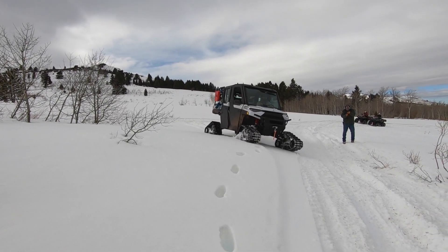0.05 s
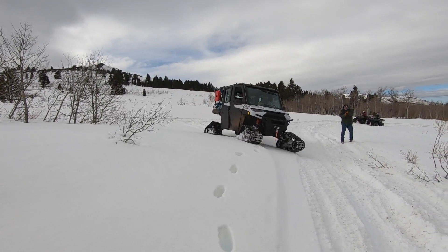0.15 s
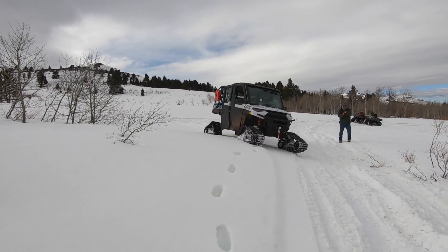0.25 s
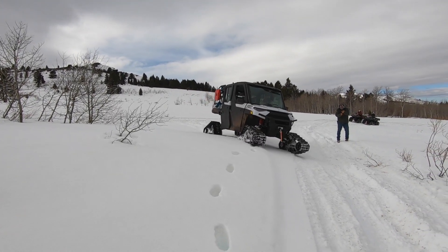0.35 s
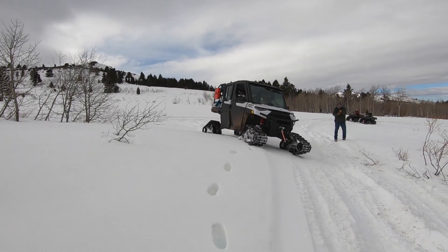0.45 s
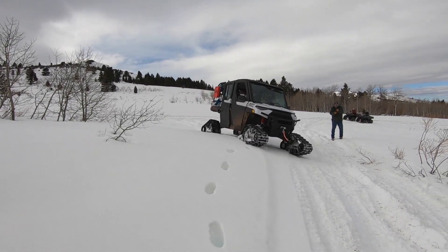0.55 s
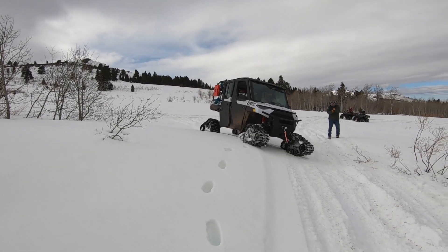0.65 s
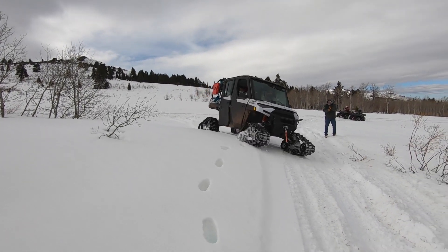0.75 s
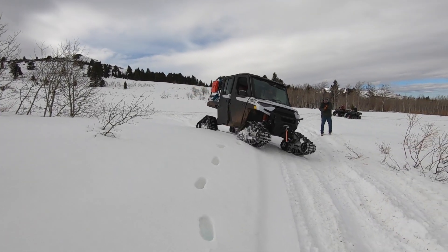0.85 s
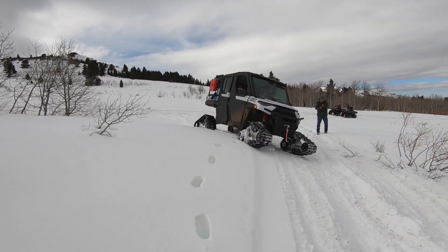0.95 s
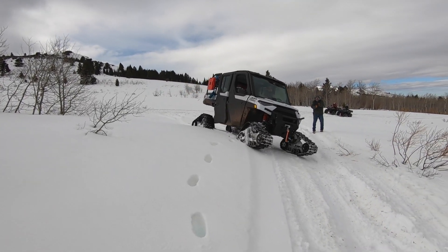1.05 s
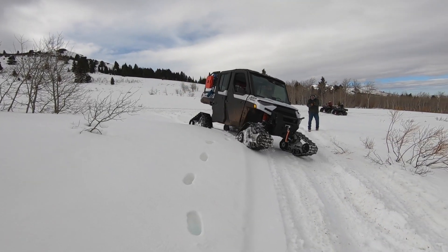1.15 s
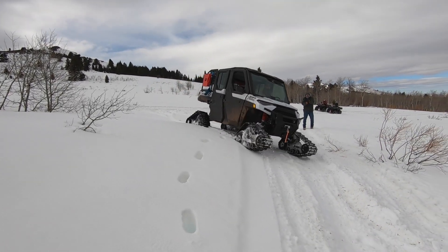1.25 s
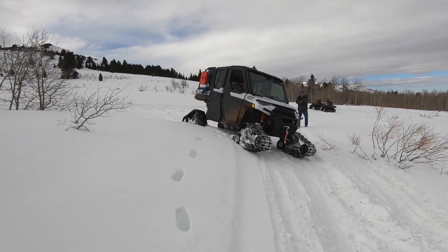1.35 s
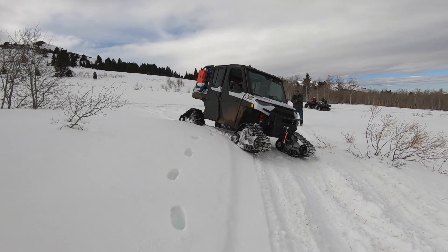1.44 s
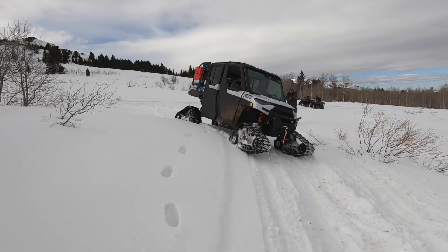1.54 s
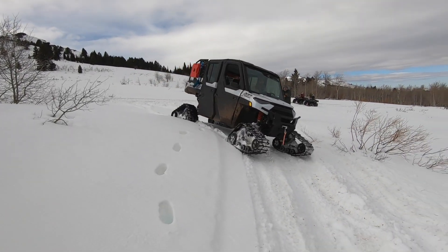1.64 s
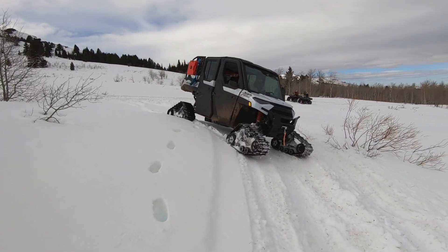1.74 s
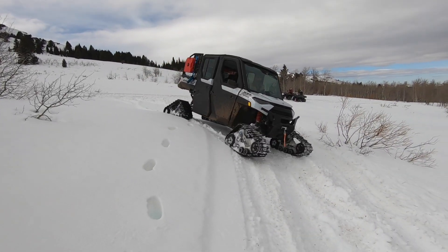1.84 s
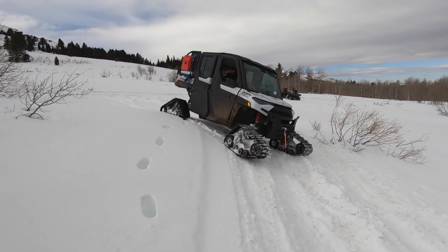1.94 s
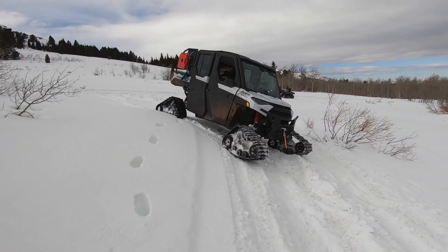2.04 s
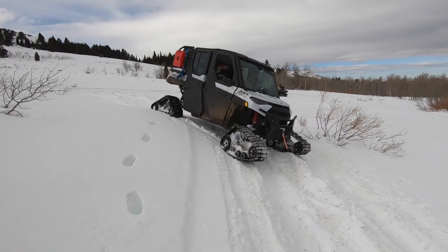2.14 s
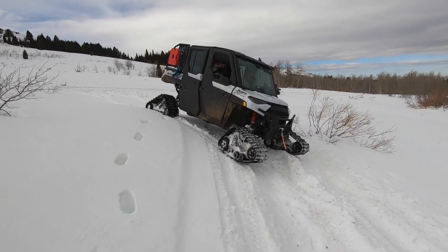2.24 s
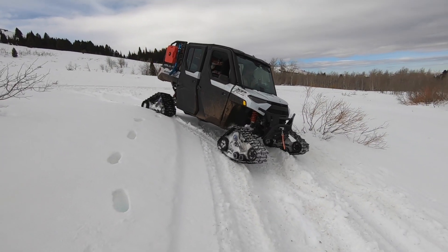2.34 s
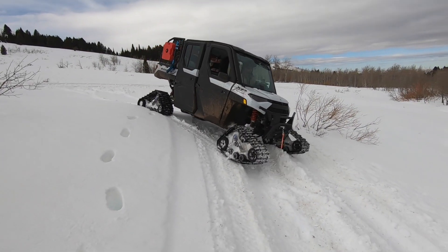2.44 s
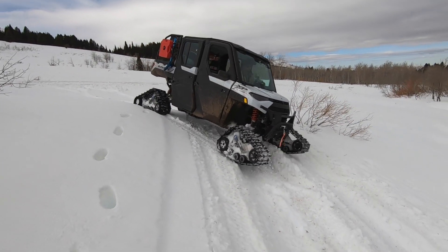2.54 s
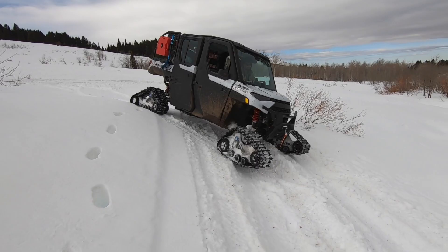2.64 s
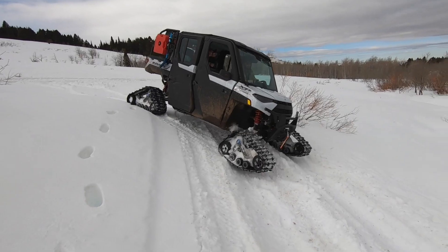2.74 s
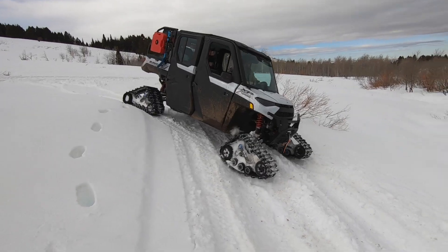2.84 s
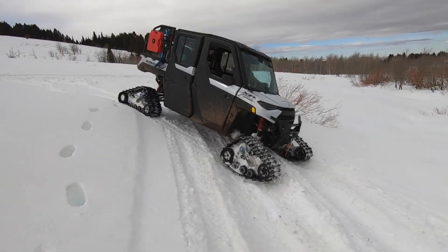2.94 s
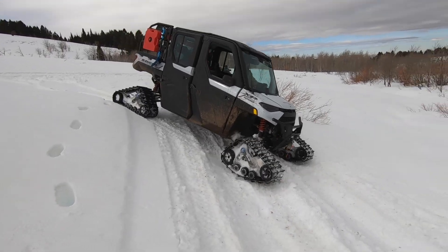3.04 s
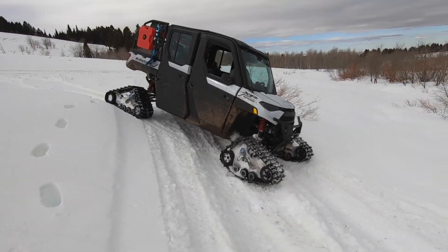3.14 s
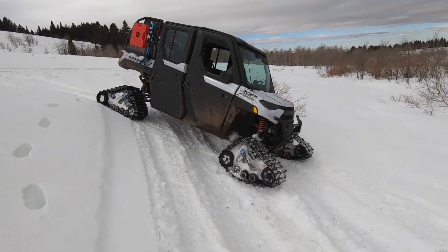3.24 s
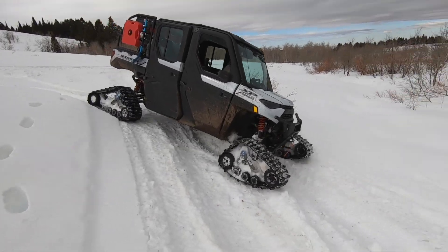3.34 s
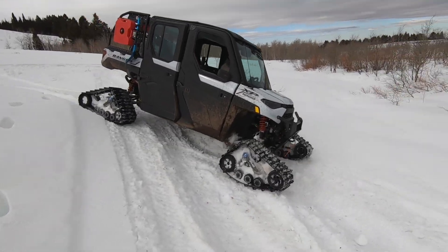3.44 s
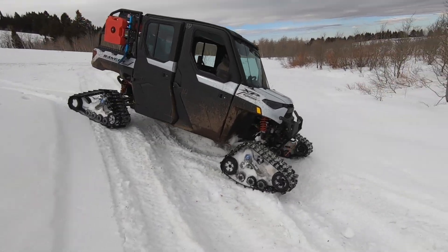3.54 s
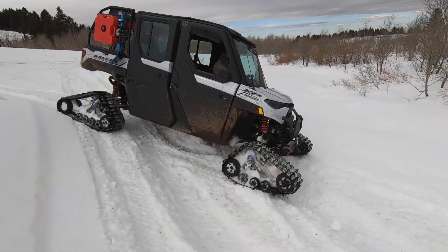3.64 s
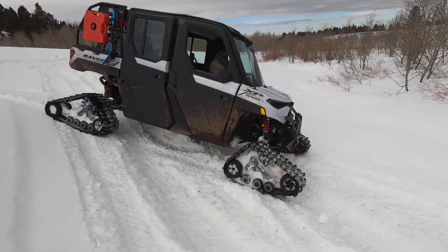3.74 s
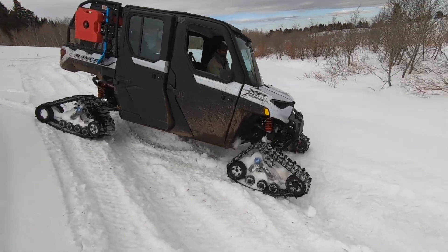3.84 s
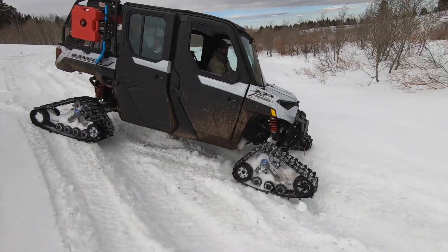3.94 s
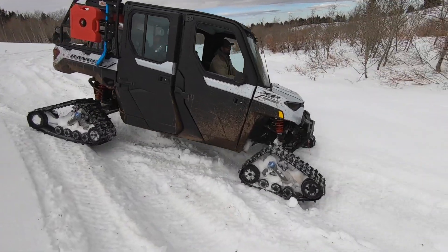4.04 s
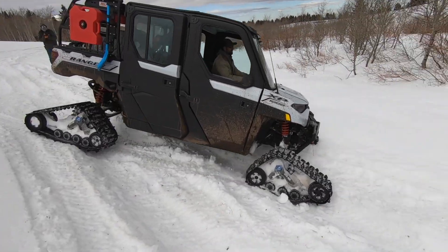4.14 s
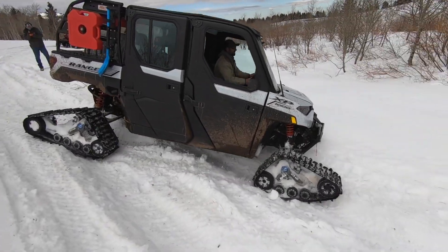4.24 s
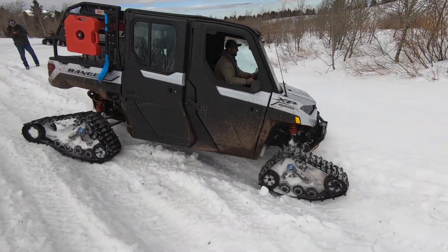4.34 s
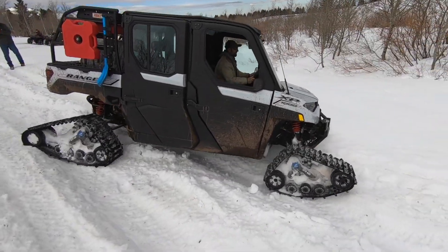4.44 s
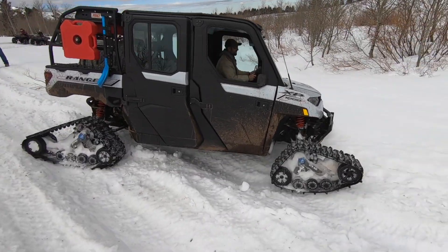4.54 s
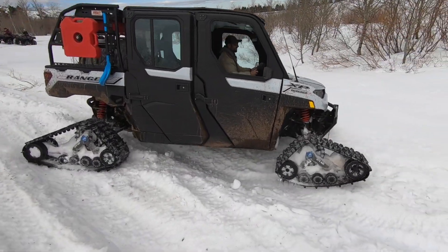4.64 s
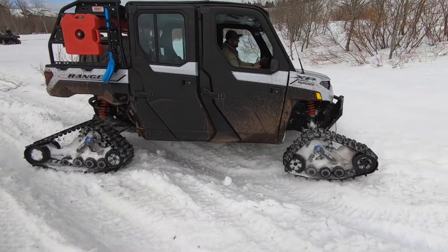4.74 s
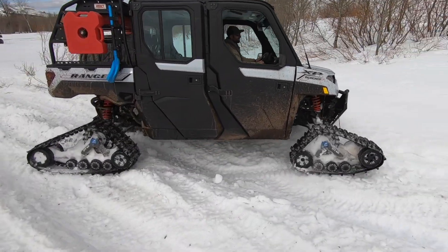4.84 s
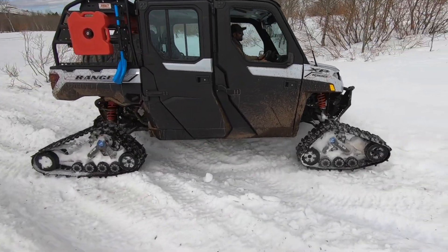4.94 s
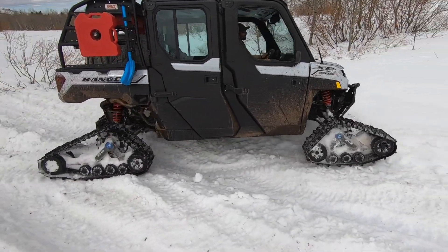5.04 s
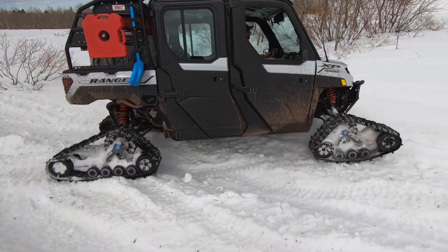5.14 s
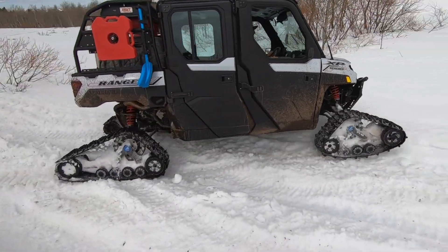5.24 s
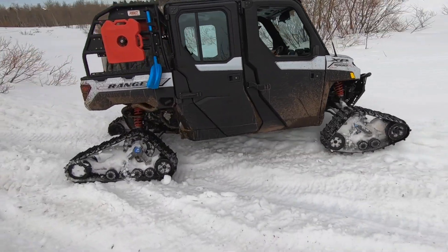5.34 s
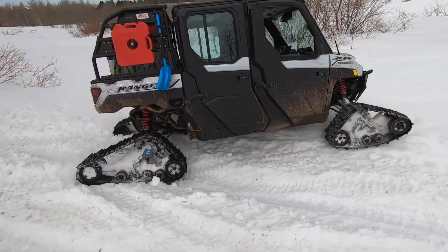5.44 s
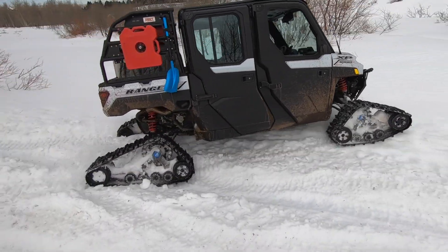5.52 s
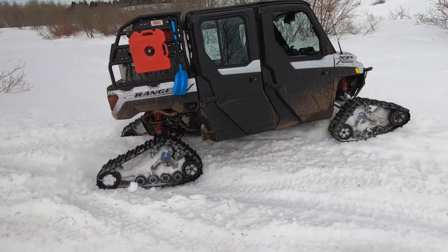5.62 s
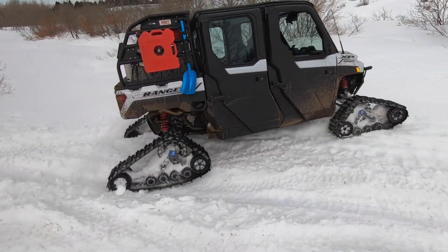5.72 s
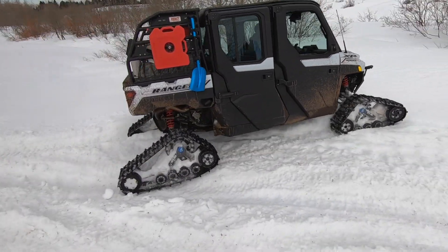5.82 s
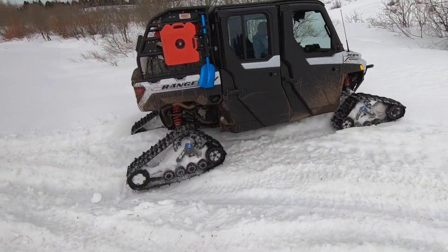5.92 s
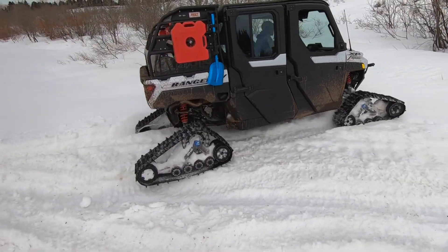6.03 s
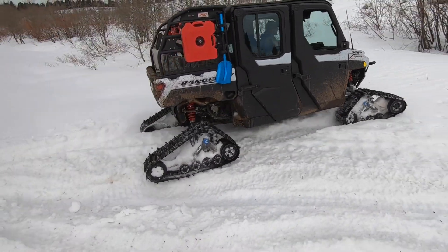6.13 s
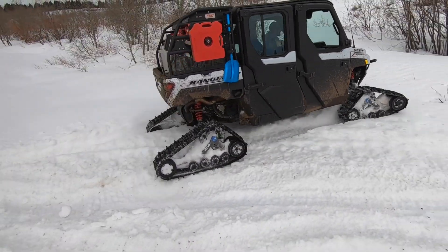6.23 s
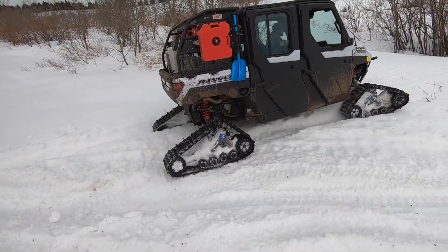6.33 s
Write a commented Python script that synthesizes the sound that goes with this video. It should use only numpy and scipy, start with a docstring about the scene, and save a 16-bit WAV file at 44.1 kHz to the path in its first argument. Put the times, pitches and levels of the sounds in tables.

```python
"""Tracked vehicle passing in snow

A utility vehicle on rubber tracks crawls up, passes close and shows its tail. Its twin engine beats
and growls through the exhaust, and the firings set body panels and track frames ringing. The tracks
roar, lugs patter on the snow and the crust crackles, while wind rumbles and thumps on the microphone."""
import sys
import numpy as np
from scipy import signal
from scipy.fft import rfft, irfft, next_fast_len
from scipy.io import wavfile
from scipy.ndimage import uniform_filter1d, map_coordinates

SR = 44100
rng = np.random.default_rng(int(sys.argv[2]) if len(sys.argv) > 2 else 0)


def unload_wav(signal):
    """Save mono or channel-first audio to the path in sys.argv[1] as 16-bit WAV at rate SR, clipped to [-1, 1]."""
    wavfile.write(
        sys.argv[1],
        SR,
        np.round(np.clip(np.atleast_2d(signal).T, -1, 1) * 32767).astype(np.int16),
    )


N = 281358
TIME = np.arange(N) / SR


def amp(db):
    """dB to gain."""
    return 10 ** (np.asarray(db) / 20)


def unit(x):
    """Scaled to rms 1."""
    return x / np.sqrt(np.mean(x ** 2) + 1e-20)


def curves(rows):
    """One automation curve for each column after the time."""
    seconds, *columns = np.transpose(rows)
    return [np.interp(TIME, seconds, column) for column in columns]


def wobble(rate):
    """A smooth random curve, rate knots a second."""
    at = np.arange(0, N + 64, 64)
    knots = rng.standard_normal(int(N * rate / SR) + 4)
    return np.interp(np.arange(N), at, map_coordinates(knots, [at * rate / SR]))


def swell(t, length):
    """A bell-shaped fade in and out around t = 0, length wide at 1/e of its peak."""
    return np.exp(-(2 * t / length) ** 2)


def filtered(x, response):
    """x through a response given as a function of Hz."""
    size = next_fast_len(N + 8192)
    return irfft(rfft(x, size) * response(np.fft.rfftfreq(size, 1 / SR)), size)[..., :N]


def coloured(x, spectrum):
    """x through an EQ of (Hz, dB) points on a log axis, rms 1."""
    points, db = np.transpose(spectrum)
    return unit(filtered(x, lambda hz: amp(np.interp(np.log(hz + 1), np.log(points + 1), db))))


def patchy(depth_db):
    """White noise with patches of random gain: short broad ones and long narrow ones."""
    spectrum = signal.stft(rng.standard_normal(N), nperseg=512)[2]

    def patches(bins, frames):
        smeared = uniform_filter1d(rng.standard_normal(spectrum.shape), bins, axis=0)
        return unit(uniform_filter1d(smeared, frames, axis=1))

    gain = amp(depth_db * (0.56 * patches(bins=8, frames=8) + patches(bins=2, frames=70)))
    return signal.istft(spectrum * gain, nperseg=512)[1][:N]


def turning(x, colours, side):
    """The colour crossfades from nose to flank to tail as the vehicle goes by."""
    return sum(np.sqrt(np.clip(1 - np.abs(side - k), 0, 1)) * coloured(x, colour)
               for k, colour in enumerate(colours))


# The fader moves of the pass. Each row: time in seconds, track level in dB, side facing us
# (0 nose, 1 flank, 2 tail), body roar level in dB, snow hiss level in dB.
PASS_BY = [(0, -39, 0.045, -49, -38), (.96, -38.5, 0.094, -41.5, -36.5), (1.3, -36, 0.2, -40.5, -34.5),
           (1.5, -37.5, 0.15, -42.5, -34.5), (1.8, -36, 0.079, -44.5, -33),
           (1.95, -39.5, .05, -43.5, -34.5), (2.1, -40, 0.031, -45.5, -36), (3.16, -33, 0.18, -41.5, -33),
           (3.6, -34, 0.72, -40.5, -33), (3.9, -31, 0.72, -30.5, -31), (4.22, -30.5, 0.89, -30, -32.5),
           (4.57, -30.5, 1.04, -27.5, -31), (4.7, -31.5, 1.5, -32.5, -34), (4.92, -30, 1.53, -29, -31),
           (5.1, -30, 1.55, -30, -30.5), (5.25, -29, 1.6, -30, -27.5), (5.47, -27.5, 1.73, -28.5, -25.5),
           (5.6, -26, 1.8, -29, -25.5), (5.75, -27.5, 1.79, -28, -27), (5.95, -27, 1.98, -29, -25.5),
           (6.15, -27.5, 1.89, -30, -27), (6.38, -28, 2, -28, -25.5)]
def pass_gain(nose_db, flank_db, tail_db):
    """A layer rides the track level, trimmed by what the facing side lets out."""
    track_db, side, *_ = curves(PASS_BY)
    return amp(track_db + np.interp(side, [0, 1, 2], [nose_db, flank_db, tail_db]))


# The revs. Each row: time in seconds, firing rate in Hz.
FIRING_RATE = [(0.0, 34), (0.3, 33.42), (0.89, 30.66), (1.42, 30.18), (1.65, 31.06), (2.31, 30.61),
               (2.95, 32.81), (3.22, 34.5), (3.5, 33.42), (3.66, 33.78), (3.95, 33.43), (4.2, 33.48),
               (4.28, 34.14), (4.51, 38.19), (4.62, 39.07), (4.9, 41.86), (5.04, 42.22), (5.33, 43.62),
               (5.65, 43), (5.83, 41.05), (5.92, 40.36), (6.0, 40.68), (6.2, 43.8), (6.28, 44.7),
               (6.38, 44.96)]
def firing_phase():
    """The engine's slightly unsteady clock: one turn of 2 pi for each firing."""
    return 2 * np.pi * np.cumsum(curves(FIRING_RATE)[0] * (1 + .0015 * wobble(8))) / SR


def orders(phase, table, level_db, unsteady_db, rate=7):
    """Sines on multiples of the firing rate, from (multiple, dB) rows, each wavering on its own."""
    smear_rad, drift_rad = .1, .6  # the pipe smears each firing; drift makes no two alike
    shaky = phase + 0.013 * wobble(25)
    out = np.zeros(N)
    for k, db in table:
        gain = np.sqrt(2) * amp(level_db + db + unsteady_db * wobble(rate))
        out -= gain * np.cos(k * shaky - smear_rad * k ** 2 + drift_rad * wobble(rate))
    return out


def buzz(phase, first, last, unsteady_db):
    """A run of neighbouring engine orders, equally loud on average."""
    return orders(phase, [(k, 0) for k in range(first, last + 1)], 0, unsteady_db)


# The exhaust's low notes. Each row: multiple of the firing rate, relative level in dB.
EXHAUST_ORDERS = [(1, 1.5), (2, -3.5), (3, -3.5), (6, -22.5), (7, -20)]
def exhaust_beat(phase):
    """The lowest orders add up to one pressure dip per firing."""
    return pass_gain(-5.5, 0, 1.5) * orders(phase, EXHAUST_ORDERS, 0, unsteady_db=2.8)


# Rough air in the exhaust. Each row: frequency in Hz, relative level in dB.
GROWL_EQ = [(80, -120), (110, -21), (140, -1), (210, -6.5), (280, -16.5), (400, -120)]
def exhaust_growl(phase):
    """Low noise that puffs once per firing."""
    puffs = amp(2.0 * np.cos(phase)) * coloured(rng.standard_normal(N), GROWL_EQ)
    return pass_gain(-23.5, -2.5, -8) * unit(puffs)


# The boom's notes. Each row: multiple of the firing rate, relative level in dB.
BOOM_ORDERS = [(4, 0), (5, -10.5)]
# Its fader. Each row: time in seconds, level in dB.
BOOM_FADER = [(0, -45), (1, -50.5), (2.3, -55), (2.6, -41.5), (2.9, -38), (3.3, -36.5), (4, -26),
              (4.15, -26), (4.24, -19.5), (4.38, -23), (4.56, -15.5), (4.68, -20.5), (4.76, -29), (5, -28),
              (5.3, -36), (5.6, -29), (5.93, -22), (6.1, -29.5), (6.38, -19.5)]
def silencer_boom(phase):
    """The silencer booms on the fourth order, with a softer fifth beside it."""
    return orders(phase, BOOM_ORDERS, curves(BOOM_FADER)[0], unsteady_db=0.8)


# The body's colour from nose, flank and tail. Each row: frequency in Hz, relative level in dB.
BODY_NOSE_EQ = [(120, -31), (200, -14), (253, -3.5), (373, -16), (398, -11.5), (492, -7), (545, -3),
                (650, 1.5), (858, -9), (1150, -6.5), (1500, -26), (2530, -120)]
BODY_FLANK_EQ = [(140, -25), (230, -6.5), (356, -16), (430, -11), (479, -14.5), (658, -1), (915, -7),
                 (992, -16.5), (1150, -12), (1500, -51), (2530, -120)]
BODY_TAIL_EQ = [(140, -34), (230, -3.5), (285, -4.5), (333, -5.5), (376, -8), (482, -8), (671, -9),
                (946, -12.5), (1150, -14.5), (1500, -48), (2530, -120)]
# Pulses against noise. Each row: time in seconds, share of clean firing pulses from 0 to 1.
PULSE_SHARE = [(1.8, .18), (2.4, .42), (3.6, .42), (3.9, .22), (4.3, .25), (4.6, .45)]
def body_roar(phase):
    """Body panels ring with firing pulses and throbbing noise."""
    _, side, body_db, _ = curves(PASS_BY)
    share = curves(PULSE_SHARE)[0]
    # the orders span about 1100 Hz, so they are scaled to the density of the noise
    firings = unit(buzz(phase, 11, 36, unsteady_db=3.5)) * np.sqrt(2 * 1100 / SR)
    noise = unit(amp(1.4 * np.cos(phase)) * patchy(depth_db=1.4))
    shaking = np.sqrt(share) * firings + np.sqrt(1 - share) * noise
    return amp(body_db) * turning(shaking, (BODY_NOSE_EQ, BODY_FLANK_EQ, BODY_TAIL_EQ), side)


# The tracks' colour from nose, flank and tail. Each row: frequency in Hz, relative level in dB.
TRACK_NOSE_EQ = [(590, -43), (1000, -1), (1270, 4.5), (1560, 0.5), (2010, 2.5), (2230, -2.5), (2420, 1.5),
                 (3270, 0.5), (3890, -1.5), (4180, -7.5), (5240, -19), (7140, -18.5), (8160, -41),
                 (9140, -34), (11700, -47), (15200, -120)]
TRACK_FLANK_EQ = [(590, -18), (1000, -6.5), (1100, -10), (1320, 3), (1480, 0), (1800, -1), (1990, -10),
                  (2210, -3), (2500, -10), (3010, -7), (3930, -15.5), (4360, -12), (7670, -24),
                  (10600, -38), (11700, -57), (15200, -84), (22000, -120)]
TRACK_TAIL_EQ = [(590, -44), (1000, -1), (1250, 0), (1480, -2), (1990, -1.5), (2470, -5), (2770, -2.5),
                 (3550, -3), (4010, -11), (4780, -15.5), (7360, -27), (10200, -44), (11700, -53),
                 (15200, -87), (22000, -120)]
def track_roar(phase):
    """Rollers and rubber roar below, crushed snow hisses above; firings and lug hits pulse both."""
    lug_hz, crossover_hz = 23.3, 2300
    track_db, side, _, hiss_db = curves(PASS_BY)
    lugs = np.cos(2 * np.pi * np.cumsum(lug_hz * (1 + 0.0383 * wobble(3.02))) / SR)
    patter = amp(0.31 * np.cos(phase) + (0.78 - 0.38 * side) * lugs + 0.56 * wobble(150))
    track = turning(patter * patchy(depth_db=1.37), (TRACK_NOSE_EQ, TRACK_FLANK_EQ, TRACK_TAIL_EQ), side)
    rubber = filtered(track, lambda hz: 1 / (1 + (hz / crossover_hz) ** 8))
    return amp(track_db) * rubber + amp(hiss_db) * (track - rubber)


def resonance(hz, centre, width):
    """The band-pass response of one ringing mode."""
    return 1j * hz * width / (centre ** 2 - hz ** 2 + 1j * hz * width)


# The modes of the front track frames. Each row: centre in Hz, width in Hz, gain per filter pass in dB.
FRAME_MODES = [(1103, 120, -4.5), (1240, 130, -0.5), (1815, 147, 1.5), (2017, 78, -1)]
def track_frames(phase):
    """Noise and engine buzz ring the front frames, which stand out most from the nose."""
    def modes_twice(hz):
        return sum((-1) ** k * amp(db) * resonance(hz, centre, width)
                   for k, (centre, width, db) in enumerate(FRAME_MODES)) ** 2

    buzz_share = .12
    engine = unit(filtered(buzz(phase, 34, 61, unsteady_db=4), modes_twice))
    noise = unit(filtered(patchy(depth_db=2.0), modes_twice))
    return pass_gain(-6, -12.5, -10) * (noise + np.sqrt(buzz_share / (1 - buzz_share)) * engine)


def panel_drone(phase):
    """One narrow panel resonance picks out whichever order crosses it, louder once it faces us."""
    centre_hz, width_hz, faces_us_s = 657, 46, 2.49
    engine = buzz(phase, 14, 24, unsteady_db=6.0)
    tone = unit(filtered(engine, lambda hz: resonance(hz, centre_hz, width_hz) ** 2))
    facing = 0.27 + 0.71 / (1 + np.exp((faces_us_s - TIME) / .1))
    return facing * pass_gain(-15.5 - .5, -13, -22) * tone


def crust_crackle():
    """The snow crust breaks in small random puffs of treble noise."""
    breaks, attack_s, decay_s = 260, .003, .045
    at, softness = rng.random((breaks, 2)).T
    kicks = np.bincount((at * N).astype(int), amp(-3 * np.log(softness + .05)), N)
    t = np.arange(SR // 10) / SR
    envelope = amp(-60 * t / decay_s) * (1 - np.exp(-t / attack_s))
    puffs = signal.fftconvolve(kicks, envelope)[:N] * rng.standard_normal(N)
    treble = filtered(puffs, lambda hz: (hz / 4200) ** 3 / (1 + (hz / 4600) ** 10))
    return pass_gain(-15.5, -20, -18) * unit(treble)


# The gusts. Each row: time in seconds, level in dB.
WIND_FADER = [(0.0, -43), (0.5, -35), (1.2, -33.5), (1.4, -35), (1.74, -31.5), (2.1, -34.5), (3.1, -35),
              (3.8, -32), (4.6, -23.5), (5.17, -26.5), (5.88, -28.5), (6.24, -25), (6.38, -29)]
# Their colour. Each row: frequency in Hz, relative level in dB.
WIND_EQ = [(7.1, -27), (12, -3), (38, 1), (88, 1.5), (204, -9.5), (265, -20.5), (372, -19.5), (400, -20),
           (520, -53), (880, -120)]
def wind_rumble():
    """Wind on the microphone makes a lumpy low rumble."""
    lumps = amp(1.55 * wobble(17))
    return amp(curves(WIND_FADER)[0]) * unit(lumps * coloured(rng.standard_normal(N), WIND_EQ))


# Fuzzy tones. Each row: centre in Hz, width in Hz, loudest moment in seconds, length in seconds,
# level in dB.
RING_SWELLS = [(4270, 90, 4.023, 0.52, -45), (1230, 45, 2.93, .6, -45), (1784, 49, 3.62, 0.52, -37),
               (1620, 50, 3.36, .3, -43), (2065, 70, 3.25, 0.38, -40), (1650, 430, 3.14, .1, -34),
               (1620, 60, 3.87, 0.17, -40), (1285, 250, 1.66, .25, -41.5), (566, 110, 4.02, 0.23, -34.5),
               (690, 140, 4.05, .5, -34), (510, 120, .2, .7, -51), (313, 60, 2.36, 0.31, -49)]
def passing_rings():
    """Frames and panels ring while they face us: narrow bands of noise that swell and fade."""
    out = np.zeros(N)
    for hz, width, loudest, length, db in RING_SWELLS:
        carrier = 2 * np.pi * hz * TIME
        band = wobble(width) * np.cos(carrier) + wobble(width) * np.sin(carrier)
        out += amp(db) * swell(TIME - loudest, length) * unit(band)
    return out


# The thumps' rough edge. Each row: frequency in Hz, relative level in dB.
THUMP_EDGE_EQ = [(150, -120), (230, 0), (480, -6), (800, -120)]
# The eddies. Each row: moment of the peak in seconds, level in dB, pitch in Hz.
WIND_THUMPS = [(.578, -30, 200), (.695, -23.5, 97), (.768, -21, 98), (.862, -17.5, 74.9),
               (.930, -22.5, 69.5), (1.038, -25.5, 185), (1.144, -30, 81.2), (1.177, -22.5, 147),
               (1.303, -23.5, 145), (1.332, -21.5, 90), (1.615, -25, 110.2), (1.678, -24, 64.75),
               (1.748, -26.5, 197), (1.762, -27, 60), (2.185, -19.5, 60), (2.450, -25, 56),
               (3.050, -23, 54.96), (3.320, -18.5, 60), (3.950, -21.5, 209), (4.270, -12.5, 65.4),
               (4.63, -16, 194.7), (4.77, -18, 120.5), (5.062, -15, 187.7), (5.087, -18, 95),
               (5.189, -12, 70)]
def wind_thumps():
    """Eddies hit the microphone port in short pressure swings; low, long ones have less edge."""
    out, half = np.zeros(N), SR // 10
    t = np.arange(-half, half) / SR
    edge = amp(-11) * coloured(rng.standard_normal(N), THUMP_EDGE_EQ)
    base_length_s, edge_hz = 0.01, 220
    for peak, db, hz in WIND_THUMPS:
        length = base_length_s + 0.0028 * peak  # later gusts are broader
        span = slice(round(peak * SR) - half, round(peak * SR) + half)
        rough = edge[span] * hz / edge_hz * (base_length_s / length) ** 2
        out[span] -= amp(db) * (np.cos(2 * np.pi * hz * t) + rough) * swell(t, length)
    return out


# Single crunches and knocks. Each row: start in seconds, level in dB, pitch of the noise band in Hz.
CRUNCH_HITS = [(1.248, -38, 4520), (2.120, -31, 3984), (2.373, -37, 5000), (2.815, -34.5, 5905),
               (3.109, -23, 1715), (3.29, -29, 4998), (3.334, -22, 4900), (3.38, -35, 4992),
               (3.848, -31, 3996), (4.53, -31, 5500), (4.574, -14, 2050), (4.893, -35, 3995)]
def crunches_and_knocks():
    """The crust crunches and the track knocks: short bursts of noise, each in its own band."""
    attack_s, decay_s = 0.0036, .06
    out, t = np.zeros(N + SR), np.arange(SR // 5) / SR
    envelope = amp(-60 * t / decay_s) * (1 - np.exp(-t / attack_s))
    for start, db, hz in CRUNCH_HITS:
        band = signal.butter(3, [hz * 0.57, hz * 1.22], "bandpass", fs=SR, output="sos")
        burst = unit(signal.sosfilt(band, rng.standard_normal(len(t))))
        out[round(start * SR):][:len(t)] += amp(db) * envelope * burst
    return out[:N]


# Notes that sing out. Each row: multiple of the firing rate, loudest moment in seconds,
# length in seconds, level in dB.
SINGING_SWELLS = [(24, 3.75, 0.6, -44), (25, 3.64, 0.6, -44), (5, 4.62, 0.28, -31.5), (6, 4.62, 0.18, -36),
                  (5, 5.07, 0.15, -30.5), (5, 5.65, 0.12, -32), (28, 4.28, 0.18, -39),
                  (26, 4.52, 0.11, -33.5), (28, 5.6, 0.34, -39), (26, 4.954, 0.27, -36),
                  (30, 6.12, 0.4, -34.5), (27, 4.74, .2, -39), (20, 4.2, 0.18, -39), (21, 2.7, 0.53, -47.5),
                  (19, 3.17, 0.39, -50), (20, 3.62, .45, -44.5)]
def singing_orders(phase):
    """Single orders swell and fade while a panel or gear faces us."""
    return sum(swell(TIME - loudest, length) * orders(phase, [(k, 0)], db, unsteady_db=2.0, rate=12)
               for k, loudest, length, db in SINGING_SWELLS)


# The whine's notes. Each row: multiple of the firing rate, relative level in dB.
WHINE_ORDERS = [(16, 0), (17, -8), (15, -18)]
# Its fader. Each row: time in seconds, level in dB.
WHINE_FADER = [(3.5, -65), (4.3, -41), (4.75, -55), (5, -38), (5.3, -40), (5.55, -31.5), (5.7, -32),
               (5.8, -33.5), (5.95, -28), (6.1, -35), (6.25, -25.5), (6.38, -35)]
def engine_whine(phase):
    """The sixteenth order and its neighbours whine as the vehicle comes close."""
    return orders(phase, WHINE_ORDERS, curves(WHINE_FADER)[0], unsteady_db=1.6, rate=13)


# The throaty overtone's fader. Each row: time in seconds, level in dB.
THROAT_FADER = [(4.2, -75), (4.6, -53.5), (4.82, -35.5), (5.1, -41.5), (5.4, -32), (5.62, -26), (5.8, -37),
                (6.05, -40), (6.32, -38)]
def engine_throat(phase):
    """The eighth order opens up as the tail comes round."""
    return orders(phase, [(8, 0)], curves(THROAT_FADER)[0], unsteady_db=1.0)


def scene():
    """Vehicle, snow and wind at one microphone."""
    phase = firing_phase()
    engine = exhaust_beat(phase) + silencer_boom(phase) + engine_throat(phase) + engine_whine(phase)
    ringing = singing_orders(phase) + panel_drone(phase) + passing_rings()
    roar = body_roar(phase) + track_roar(phase) + exhaust_growl(phase) + track_frames(phase)
    crunch = crust_crackle() + crunches_and_knocks()
    wind = wind_rumble() + wind_thumps()
    return (engine + ringing + roar + crunch + wind)[None]


def record(dry):
    """A hard high cut takes off the top of the treble."""
    top_hz = 11860
    return filtered(dry, lambda hz: hz < top_hz)


dry = scene()
out = record(dry)
unload_wav(out)
```